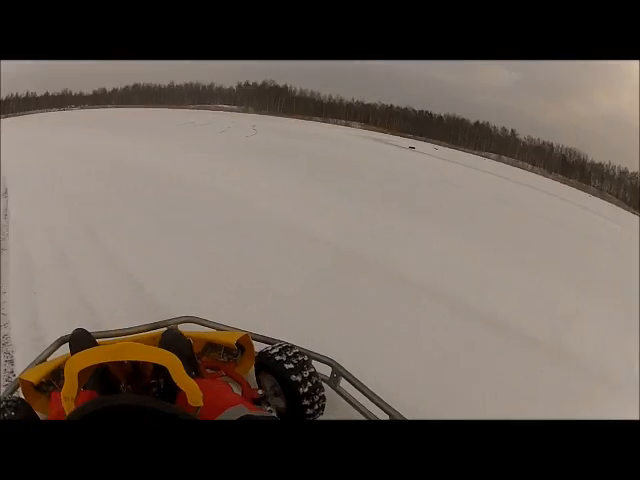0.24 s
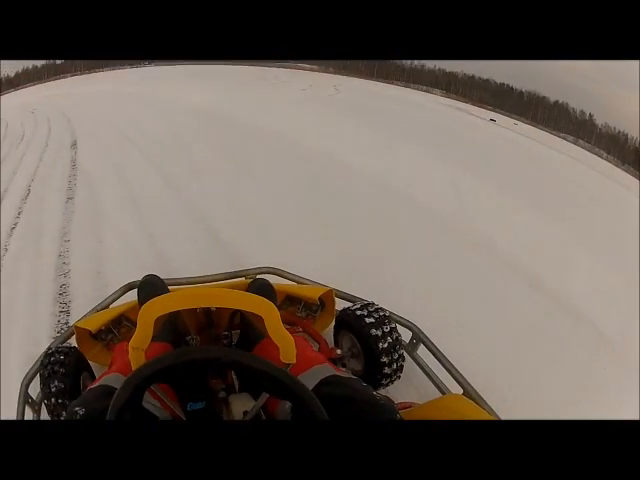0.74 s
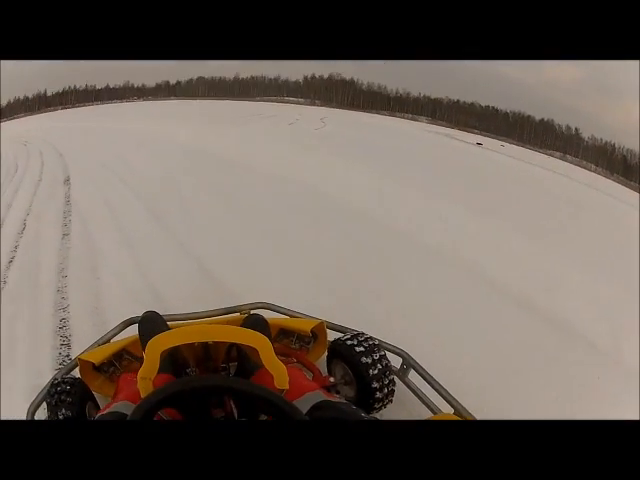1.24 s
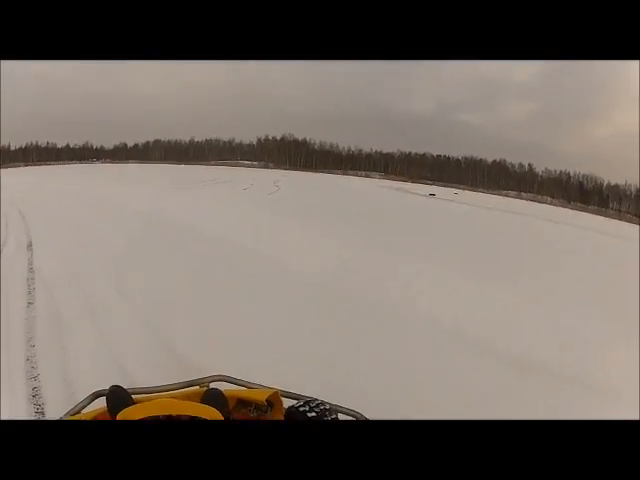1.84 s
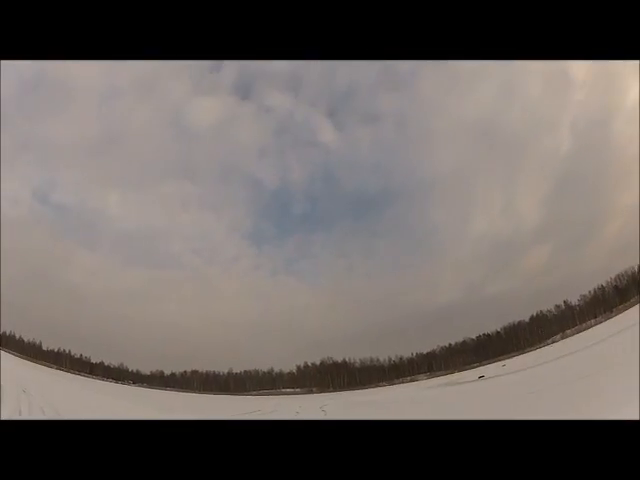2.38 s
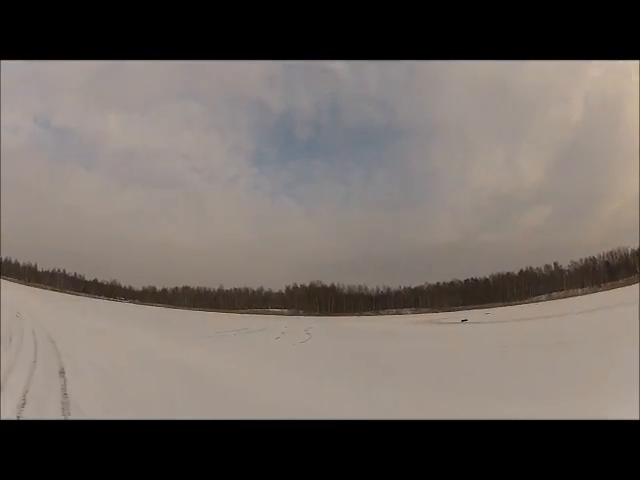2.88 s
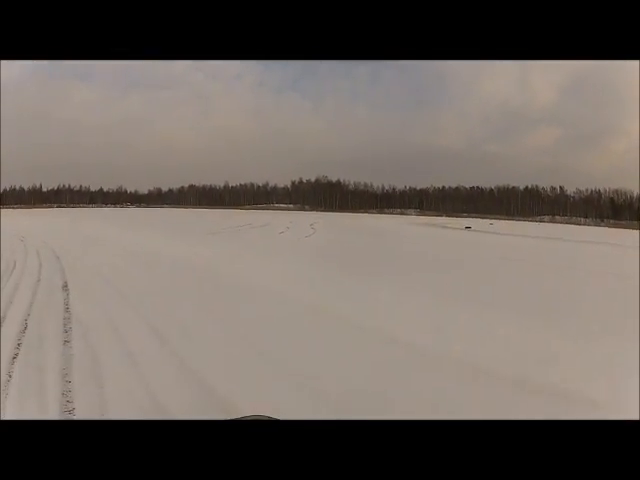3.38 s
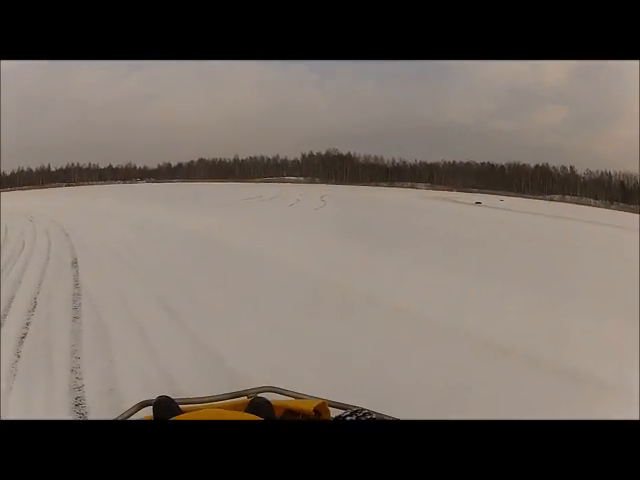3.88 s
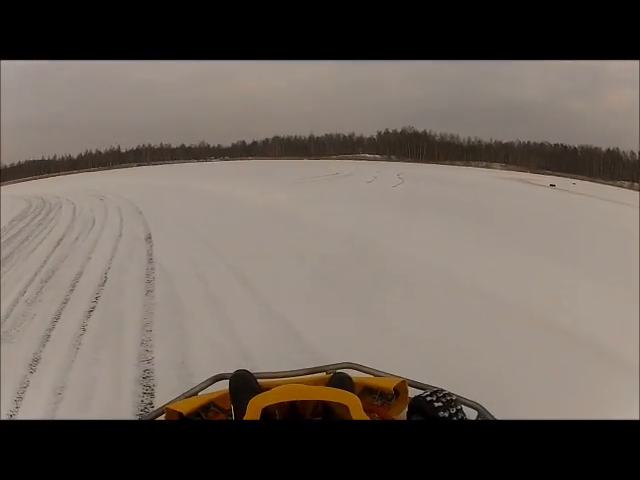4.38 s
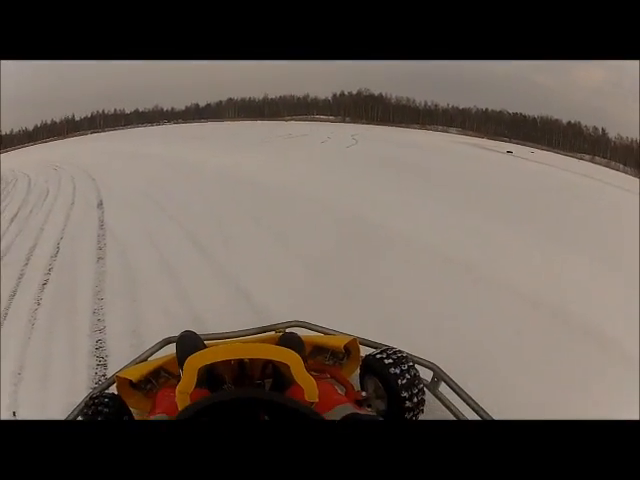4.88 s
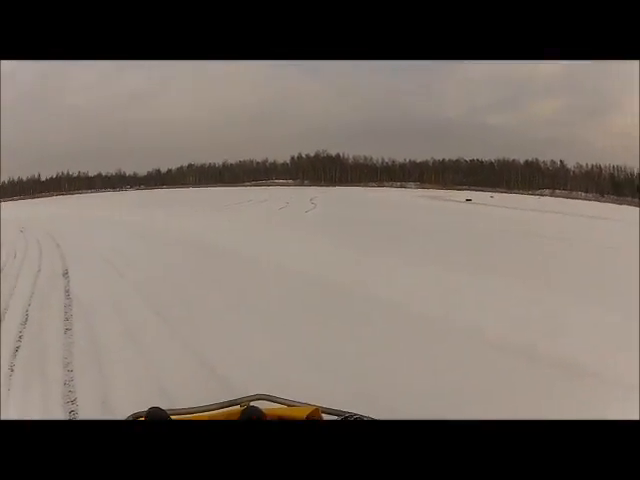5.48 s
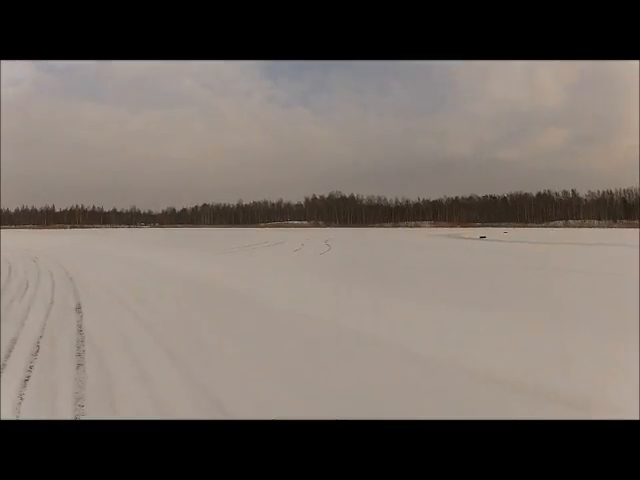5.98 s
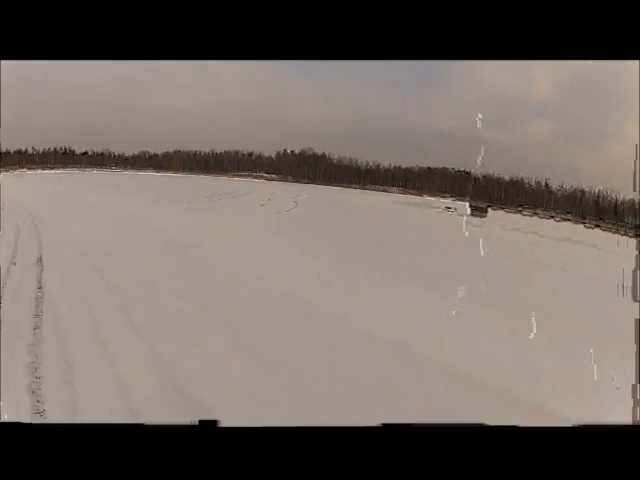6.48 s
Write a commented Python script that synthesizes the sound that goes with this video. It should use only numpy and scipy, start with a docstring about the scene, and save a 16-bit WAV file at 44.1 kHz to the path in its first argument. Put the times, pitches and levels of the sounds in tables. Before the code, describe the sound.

A kart rolls over snowy ice, its small engine idling faintly under tyre hiss and crunches, as low thumps and plastic clacks grow louder.

```python
"""Kart on a frozen lake

A kart slows on snowy ice, heard from a cased action camera that rides with the driver.
The small engine ticks over under the hiss of the tyres; patches of crusted snow crunch.
Ever harder jolts boom in the camera mount and make its plastic case clack."""
import sys
import numpy as np
from scipy import signal
from scipy.fft import rfft, irfft
from scipy.io import wavfile
from scipy.ndimage import uniform_filter1d

SR = 44100
rng = np.random.default_rng(int(sys.argv[2]) if len(sys.argv) > 2 else 0)


def pcm_store(signal):
    """Save signal as 16-bit PCM."""
    levels = np.round(np.clip(np.atleast_2d(signal), -1, 1) * 32767)
    wavfile.write(sys.argv[1], SR, levels.astype(np.int16).T)


N = 296789
T = np.arange(N) / SR


def gain(db):
    """Turn decibels into a multiplier."""
    return 10 ** (np.asarray(db) / 20)


def unit(x):
    """Scale a sound to an average (rms) level of 1."""
    return x / np.sqrt(np.mean(x ** 2))


def curve(table):
    """Join (seconds, value) points with straight lines."""
    return np.interp(T, *np.transpose(table))


def add(track, s, sound):
    """Mix a sound into the track at s seconds."""
    start = max(int(s * SR), 0)
    track[start:start + len(sound)] += sound[:N - start]


def ring(force, tones):
    """A force makes an object ring at its own tones; wider tones die sooner."""
    t = T[:SR // 2]
    response = sum(gain(db) * np.exp(-np.pi * width * t) * np.cos(2 * np.pi * hz * t)
                   for hz, width, db in tones)
    return signal.fftconvolve(force, response)[:len(force)]


def band(x, low_hz, high_hz):
    """Keep what lies between two frequencies."""
    return signal.sosfilt(signal.butter(5, [low_hz, high_hz], "band", fs=SR, output="sos"), x)


def noise(points):
    """Noise whose bass and treble follow (Hz, dB) points."""
    hz, db = np.transpose(points)
    bins = np.maximum(np.fft.rfftfreq(N, 1 / SR), 1)
    shape = gain(np.interp(np.log(bins), np.log(hz), db))
    return unit(irfft(rfft(rng.standard_normal(N)) * shape, N))


def wander(per_second):
    """A smooth random drift, roughly between -1 and 1."""
    hold = int(SR / per_second)
    steps = np.repeat(rng.standard_normal(N // hold + 1), hold)
    return 1.3 * uniform_filter1d(uniform_filter1d(steps, hold), hold)[:N]


def grains(per_second, spread_db):
    """Random snaps, as of breaking snow crystals: many tiny, a few larger."""
    sizes = gain(spread_db * np.minimum(rng.exponential(size=N), 5))
    return (rng.random(N) < per_second / SR) * rng.choice([-1, 1], N) * sizes


# The idling engine. Each row: time in seconds, level in dB.
ENGINE_LEVELS = [(0, -54), (.8, -52), (1.5, -56), (6.73, -51.5)]

def engine(firing_hz=13.2):
    """A single cylinder idles: each uneven firing lets out a soft puff."""
    phase = np.cumsum(firing_hz * (1 + 0.043 * wander(5.7))) / SR % 1
    exhaust = noise([(30, 22.5), (80, -25), (320, 8.5), (700, 0), (1300, 14), (4000, -7.5)])
    puffs = np.exp(-phase / 0.28) * exhaust
    return unit(puffs) * gain(curve(ENGINE_LEVELS))


# The rolling kart's rumble. Each row: frequency in Hz, relative level in dB.
RUMBLE_SHAPE = [(18, -15), (28, -3.5), (40, 2), (55, -8.5), (90, -14), (160, -14), (330, -19), (480, -27.5),
                (700, -34.5), (1200, -73.5)]
# The mount trembles as the ice gets rougher. Each row: time in seconds, strength in dB.
SHAKE_LEVELS = [(0, -50), (1.3, -50.5), (1.75, -36.5), (2.4, -32.5), (3.1, -34), (3.4, -30), (4.1, -30.5),
                (4.5, -35), (4.7, -24.5), (5.0, -29), (5.25, -22), (5.7, -26), (6.1, -21), (6.73, -27)]

def chassis(hiss_db, shake_db):
    """The frame rumbles as it rolls, and small bumps keep the mount trembling."""
    rumble = noise(RUMBLE_SHAPE) * gain(-43 + hiss_db - np.median(hiss_db))
    bumps = noise([(20, -6), (45, 15), (90, 4), (165, 0), (300, -13), (600, -35.5), (1500, -57)])
    bumps *= gain(3.8 * wander(25))
    return rumble + unit(ring(bumps, MOUNT_TONES)) * gain(shake_db - 4)


# How the plastic case rings. Each row: pitch in Hz, width in Hz, level in dB.
CASE_TONES = [(538, 12.2, -18.5), (920, 185, -14), (1169, 53, -6), (1302, 194, 7.5), (1722, 181, 4),
              (1950, 200, -51), (2240, 69, -14), (2680, 32, -28), (3287, 170, -10.5), (3520, 170, -4),
              (4110, 140, -8.5)]

def case(force, tones=CASE_TONES):
    """The closed case rings and keeps out the high treble."""
    return band(ring(force, tones), 257, 3380)


def rattles(shake_db):
    """The case buzzes faintly in short flurries, louder as the mount trembles more."""
    flurries = gain(7 * np.minimum(wander(per_second=40), 2))
    buzz = case(grains(per_second=600, spread_db=1))
    return unit(buzz * flurries) * gain(-39 + 0.49 * shake_db)


# The tyres on the snow. Each row: time in seconds, level in dB.
HISS_LEVELS = [(0.0, -42.5), (0.37, -48), (0.58, -42.5), (1.07, -50), (2.36, -46.5), (2.85, -51.5),
               (3.37, -46.5), (4.59, -49), (4.76, -44), (5.0, -47.5), (5.34, -43.5), (5.77, -50.5),
               (6.26, -42.5), (6.73, -50.5)]
# How icy grit rings. Each row: pitch in Hz, width in Hz, level in dB.
GRIT_TONES = [(3300, 98, -9), (4080, 130, -6.5), (5250, 940, 7)]

def tyres(hiss_db):
    """Treads press the snow: a grainy hiss that flutters, with a faint sizzle of loose crystals."""
    hiss = unit(case(grains(per_second=2200, spread_db=1)))
    crystals = ring(grains(per_second=500, spread_db=3), GRIT_TONES)
    sizzle = unit(band(crystals, 3000, 6500))
    return (hiss + gain(-23) * sizzle) * gain(hiss_db - 0.04 + 1.4 * wander(35))


# How the running gear rings. Each row: pitch in Hz, width in Hz, level in dB.
GEAR_TONES = [(3174, 64, -4.5), (4184, 73, -7)]

def gear_ticks(start_s=2.297, first_turn_s=0.059, turn_growth=1.05, fade_db=2.2, count=10):
    """The coasting gear rubs briefly once a turn, ever more slowly and softly."""
    out, t, s = np.zeros(N), T[:SR // 10], start_s
    for turn, chance in enumerate(rng.standard_normal((count, len(t)))):
        detuned = [(hz * (1 + 0.04 * off), width, db)
                   for (hz, width, db), off in zip(GEAR_TONES, chance[-2::-1])]
        rub = ring(chance * np.exp(-t / 0.0049), detuned)
        tick_db = -34 - fade_db * turn + 2 * chance[-1]
        add(out, s, rub * gain(tick_db) / np.abs(rub).max())
        s += first_turn_s * turn_growth ** turn
    return band(out, 2860, 4130)


# Patches of crusted snow. Each row: start in seconds, level in dB, grit in dB relative to that.
CRUST_PATCHES = [(0.481, -26.5, -26), (0.549, -24, -24), (0.607, -27, -24), (1.401, -33, -32),
                 (1.767, -24.5, -27), (1.827, -29, -18), (2.288, -32, -32), (2.361, -28.5, -27),
                 (3.087, -29, -31), (3.412, -27, -23), (3.572, -30, -46), (4.045, -27.5, -21),
                 (4.583, -24.5, -21), (4.641, -21.5, -24.5), (5.173, -29, -47), (5.333, -31.5, -25),
                 (5.821, -28, -32), (6.157, -30, -42), (6.409, -23, -36)]
# The hollow groan of crust under a tyre. Each row: pitch in Hz, width in Hz, level in dB.
GROAN_TONES = [(320, 75, -0.5), (396, 104, -2.5)]

def crunches(rise_s=0.0088, fade_s=0.025, groan_fade_s=0.048):
    """Crust gives way in showers of grains, heard through the case, with grit on top and a groan below."""
    body_level, grit_level, groan_level = np.zeros((3, N))
    for s, db, grit_db in CRUST_PATCHES:
        age = T - s - 0.003
        shower = gain(db) * np.exp(np.minimum(age / rise_s, -age / fade_s))
        body_level += shower
        grit_level += shower * gain(grit_db)
        groan_level += gain(db) * np.exp(np.minimum(age / rise_s, -age / groan_fade_s))
    snaps = grains(per_second=2000, spread_db=2.5) * gain(2 * wander(250))  # grains break in clusters
    body = body_level * unit(case(snaps))
    grit = grit_level * unit(band(ring(snaps, GRIT_TONES), 2200, 8000))
    groan = groan_level * unit(band(ring(snaps, GROAN_TONES), 240, 503))
    return gain(-8) * body + gain(0.5) * grit + gain(-18) * groan


# Knocks of the case. Each row: start in seconds, peak level in dB, brightness in dB.
CASE_KNOCKS = [(1.828, -29, -6), (2.01, -20.5, -14.5), (2.223, -23.5, -27), (2.812, -20, -30),
               (3.11, -22.5, -16), (3.757, -29.5, -17), (3.804, -27, -30), (4.015, -25.5, -8.5),
               (4.117, -14, -22), (4.202, -18, -20), (4.264, -31, -33), (4.7, -32, -18), (4.738, -24, -21),
               (4.938, -22, -14), (5.174, -21.5, -18), (5.377, -14, -19), (5.53, -19, -24),
               (5.543, -13, -18.5), (6.306, -27, -9), (6.361, -25.5, -5), (6.396, -15, -13.5)]

def clacks(chatter=0.11, chatter_s=0.0072, spot_db=3):
    """The case knocks on its mount, each time at another spot, and chatters briefly."""
    out, t = np.zeros(N), T[:SR // 5]
    soft_contact = signal.butter(1, 2400, fs=SR, output="sos")
    usual_bright_db = np.median(np.array(CASE_KNOCKS)[:, 2])
    for (s, db, bright_db), chance in zip(CASE_KNOCKS, rng.standard_normal((len(CASE_KNOCKS), len(t)))):
        knock = (t == 0) + chatter * chance * np.exp(-t / chatter_s)
        force = signal.sosfilt(soft_contact, knock)
        tilt_db = 0.94 * (bright_db - usual_bright_db)  # per octave above 1300 Hz
        tones = [(hz, width, tone_db + spot_db * spot + tilt_db * max(np.log2(hz / 1300), 0))
                 for (hz, width, tone_db), spot in zip(CASE_TONES, chance[::-1])]
        clack = case(force, tones) + gain(-1.5) * ring(force, MOUNT_TONES[-1:])  # the mount rings too
        add(out, s, clack * gain(db) / np.abs(clack).max())
    return out


# How the camera mount rings. Each row: pitch in Hz, width in Hz, level in dB.
MOUNT_TONES = [(40.6, 6.2, -8), (84.86, 10.7, 2.5), (118, 39, 5.5), (158.6, 36, 5), (234.2, 18.6, -3.5),
               (271.5, 14.7, -2), (345.4, 8.2, -10), (534, 16, -15.5)]
# How well a blow reaches the mount. Each row: frequency in Hz, boost in dB.
BLOW_REACH = [(84, 4), (165, 11), (280, 5)]
# Blows to the mount. Each row: time in seconds, strength in dB, softness in dB lost per octave.
MOUNT_BLOWS = [(2.009, -29.5, -1), (2.174, -22, 32), (2.222, -27.5, 6), (2.446, -17.5, 17),
               (2.492, -16, 21), (2.809, -25.5, 13), (2.861, -15, 16.5), (3.046, -17.5, 8),
               (3.106, -19.5, 6), (3.159, -20, 14), (3.575, -18.5, 18.5), (3.852, -24, 5.5),
               (3.99, -23.5, 7.5), (4.01, -29.5, 3), (4.113, -10.5, 7), (4.619, -19, 12.5),
               (4.664, -21, 17), (4.742, -7, 18), (4.847, -19, 17), (4.891, -16, 15), (4.93, -11, 8),
               (5.17, -17.5, 6.5), (5.193, -13.5, 7), (5.365, -14, 12.5), (5.497, -5, 16.5),
               (5.542, -15.5, 6.5), (5.769, -12.5, 16), (5.846, -11.5, 23), (6.04, -11.5, 27),
               (6.14, -13.5, 27), (6.39, -13, 16), (6.573, -10.5, 23)]

def jolts(boom_hz=83.7):
    """Bumps and crust set the mount booming; the softer the blow, the weaker the tones above boom_hz."""
    out, t = np.zeros(N), T[:SR // 2]
    blows = MOUNT_BLOWS + [(s, db - 10, 3) for s, db, _ in CRUST_PATCHES]  # each crunch adds a nudge
    detunes = 1 + 0.02 * rng.standard_normal((len(blows), len(MOUNT_TONES)))
    for (s, strength_db, softness_db), detune in zip(blows, detunes):
        for k, (hz, width, db) in enumerate(MOUNT_TONES):
            loss_db = softness_db * max(np.log2(hz / boom_hz), 0)
            push_db = strength_db - loss_db + np.interp(hz, *np.transpose(BLOW_REACH))
            cycles = hz * detune[k] * t
            swell = 1 - np.exp(-(cycles / 0.79) ** 2)
            swing = swell * np.exp(-np.pi * width * t) * np.sin(2 * np.pi * cycles)
            # tones start half a cycle early, neighbours in opposite directions
            add(out, s - 0.5 / hz, (-1) ** k * gain(push_db + db) * swing)
    return signal.sosfilt(signal.butter(2, 28, "high", fs=SR, output="sos"), out)


def scene():
    """Everything reaches one microphone inside the case; the open lake gives no echo."""
    hiss_db, shake_db = curve(HISS_LEVELS), curve(SHAKE_LEVELS)
    knocks = jolts() + clacks() + crunches() + gear_ticks()
    rolling = tyres(hiss_db) + chassis(hiss_db, shake_db) + engine() + rattles(shake_db)
    return (knocks + rolling)[None]


def record(dry):
    """The camera samples at 12 kHz and holds each value, which mirrors the sound into a gritty treble."""
    dull = signal.sosfiltfilt(signal.butter(10, 5800, fs=SR, output="sos"), dry)
    coarse = signal.resample_poly(dull, 12000, SR, axis=1)
    held = np.repeat(coarse, 4, axis=1)
    gritty = signal.resample_poly(held, SR, 48000, axis=1)[:, :N]
    top_cut = signal.ellip(8, 0.2, 70, 15300, fs=SR, output="sos")
    return signal.sosfilt(top_cut, gritty)


dry = scene()
out = record(dry)
pcm_store(out)
```